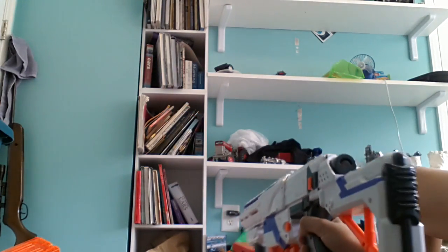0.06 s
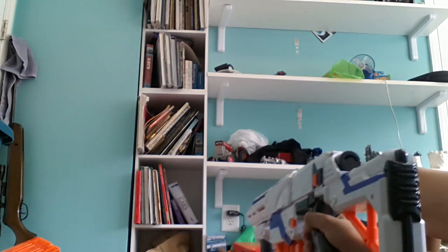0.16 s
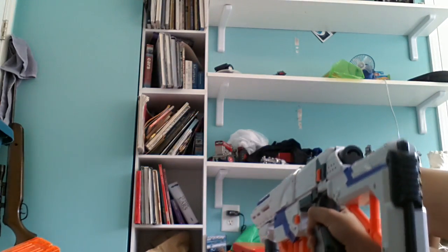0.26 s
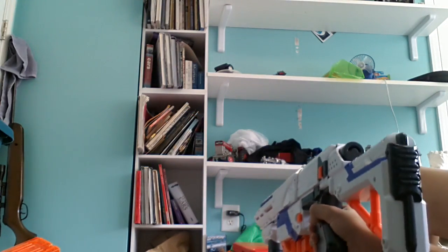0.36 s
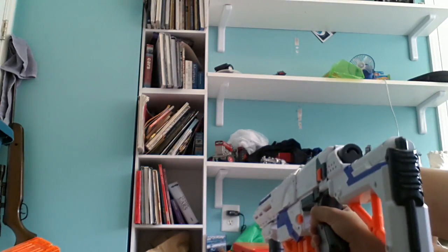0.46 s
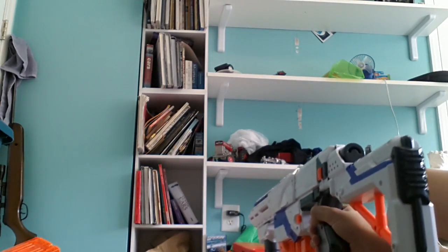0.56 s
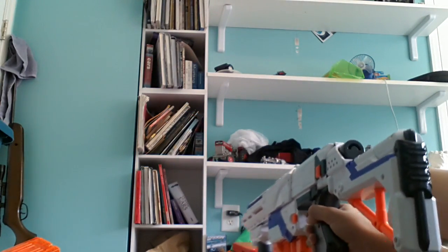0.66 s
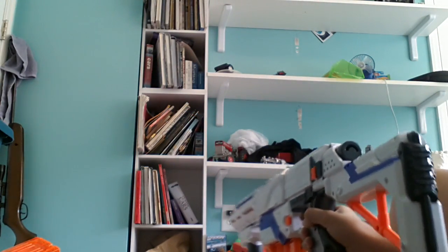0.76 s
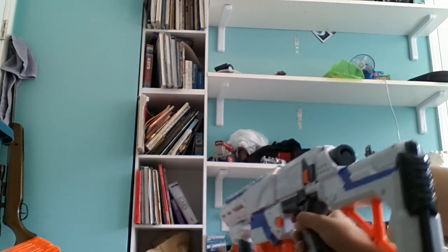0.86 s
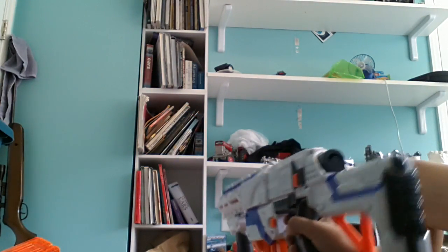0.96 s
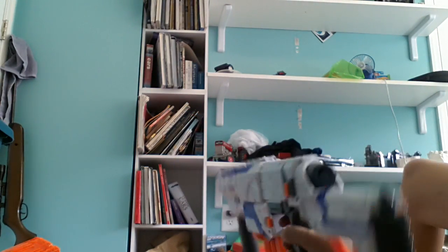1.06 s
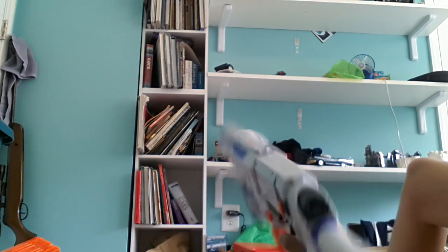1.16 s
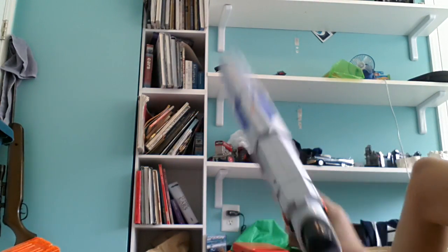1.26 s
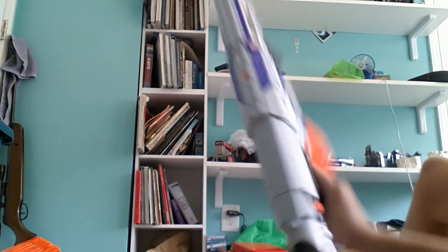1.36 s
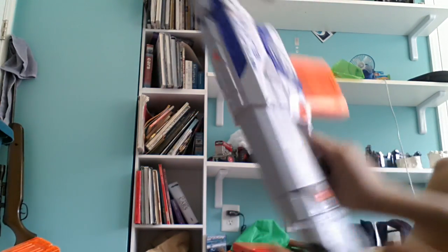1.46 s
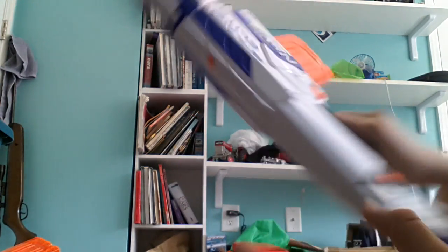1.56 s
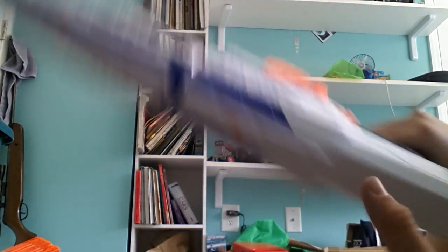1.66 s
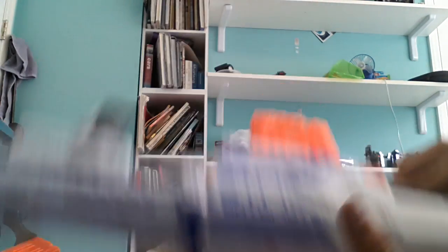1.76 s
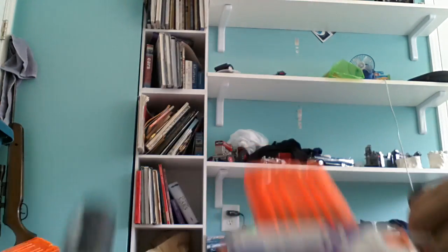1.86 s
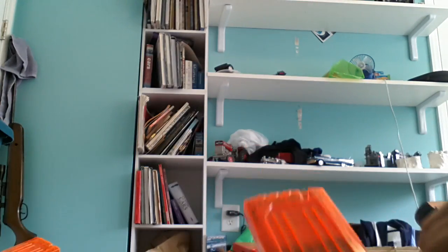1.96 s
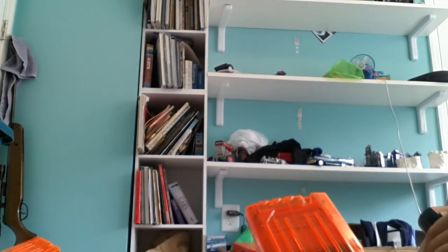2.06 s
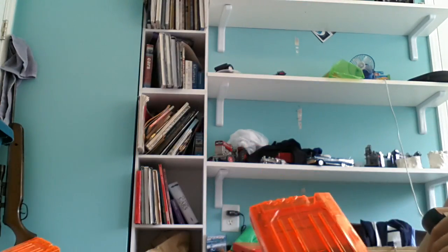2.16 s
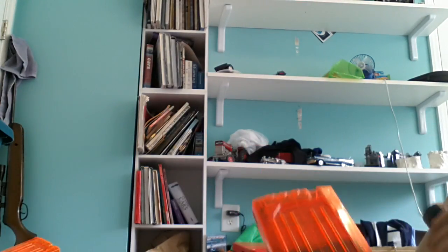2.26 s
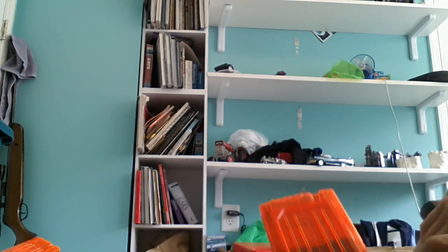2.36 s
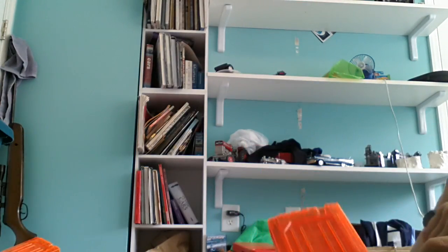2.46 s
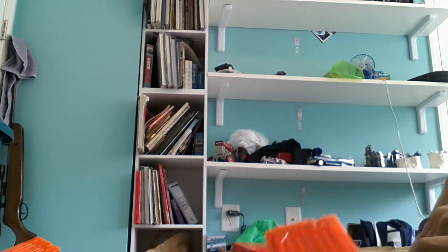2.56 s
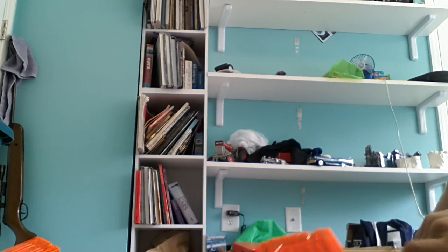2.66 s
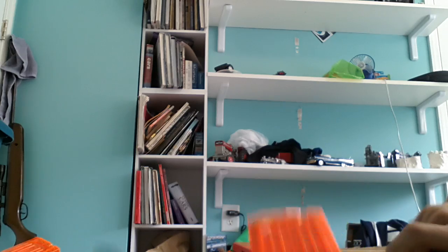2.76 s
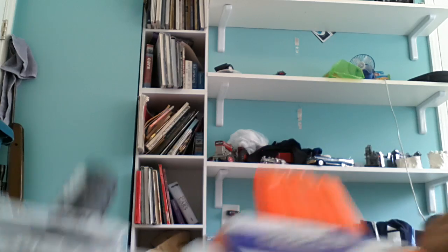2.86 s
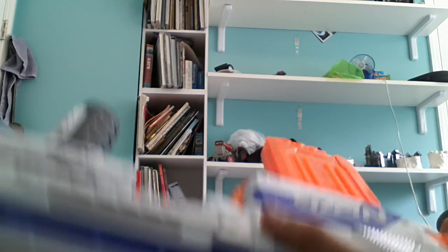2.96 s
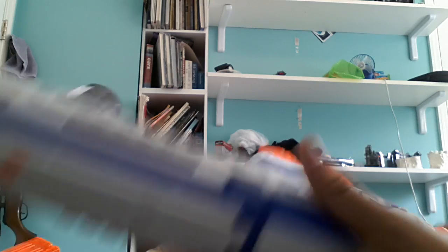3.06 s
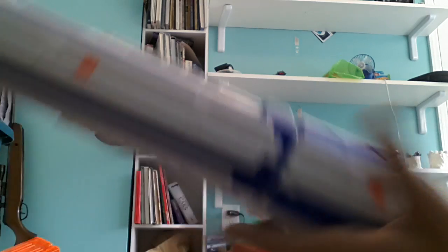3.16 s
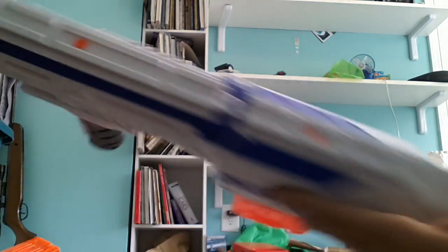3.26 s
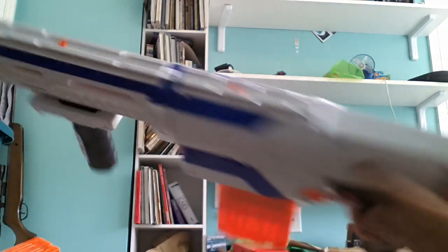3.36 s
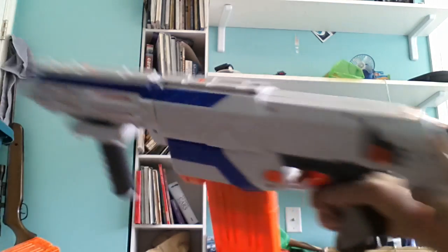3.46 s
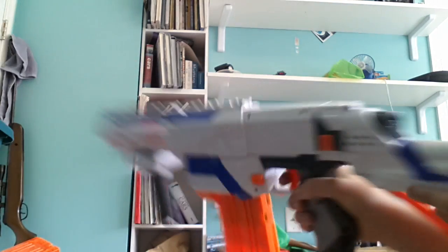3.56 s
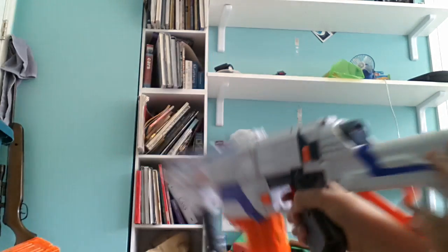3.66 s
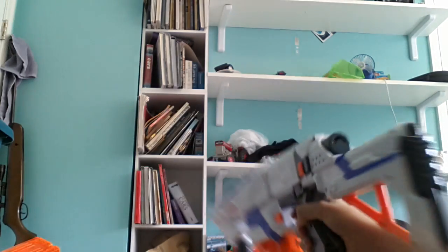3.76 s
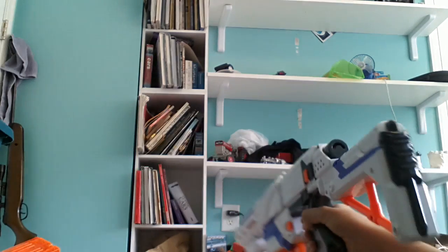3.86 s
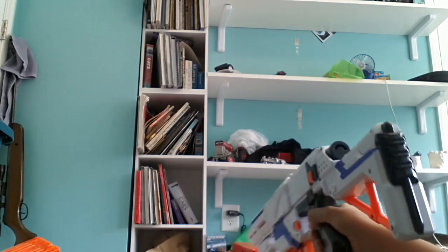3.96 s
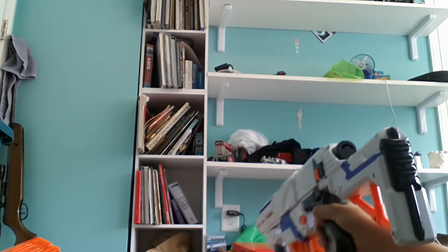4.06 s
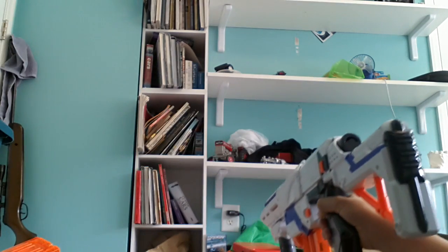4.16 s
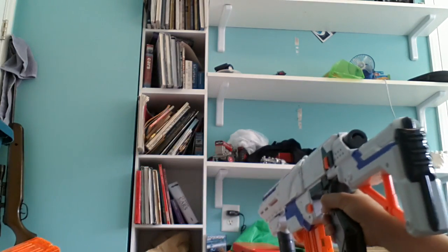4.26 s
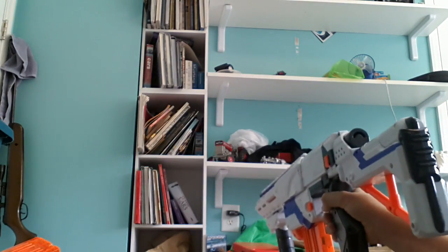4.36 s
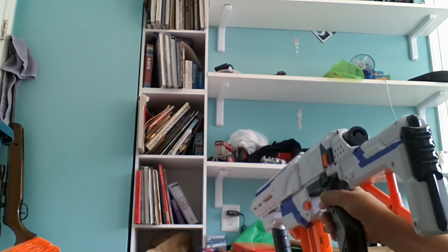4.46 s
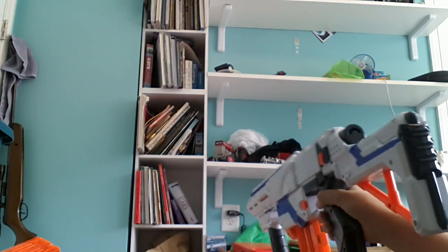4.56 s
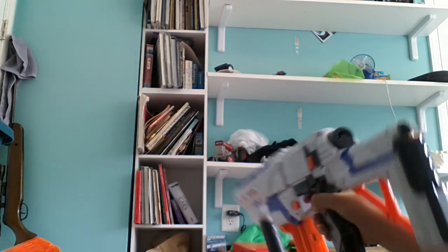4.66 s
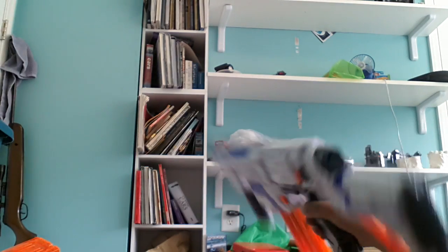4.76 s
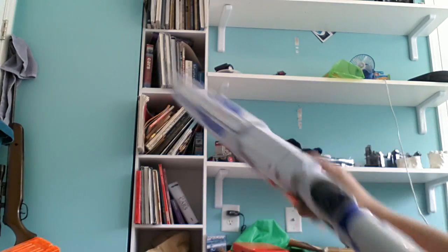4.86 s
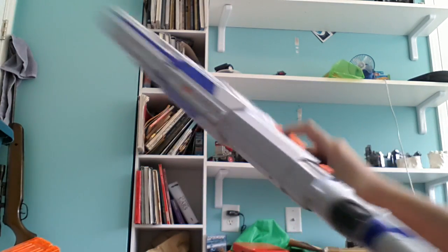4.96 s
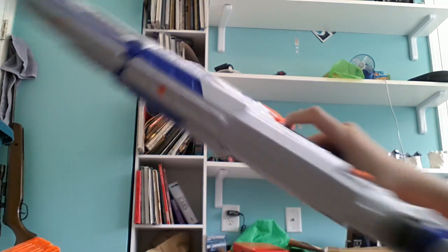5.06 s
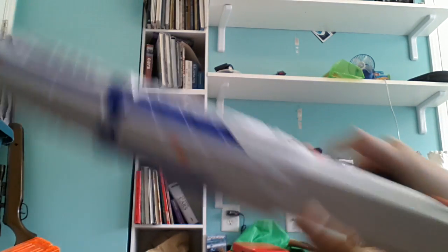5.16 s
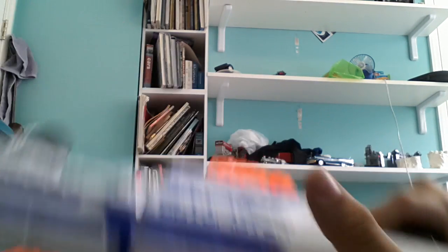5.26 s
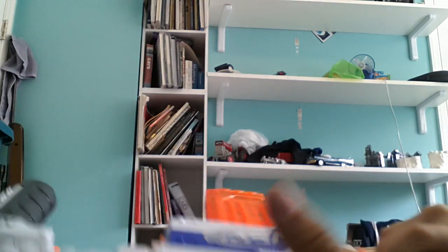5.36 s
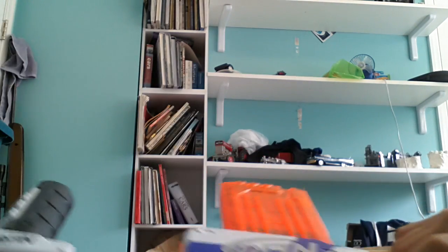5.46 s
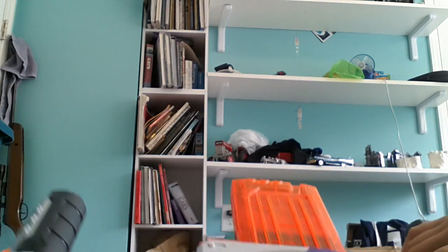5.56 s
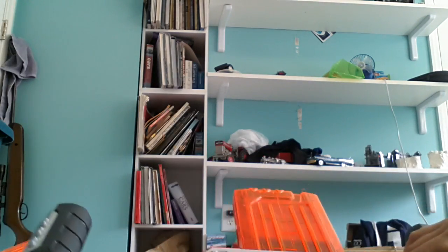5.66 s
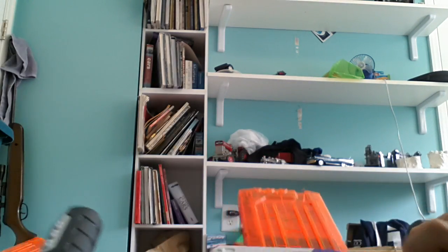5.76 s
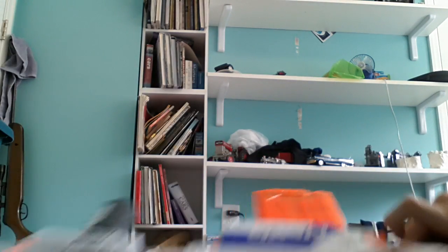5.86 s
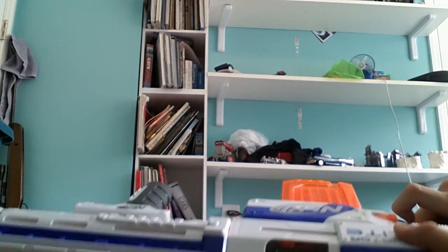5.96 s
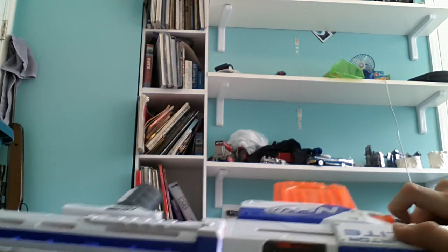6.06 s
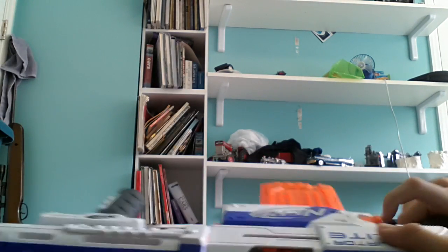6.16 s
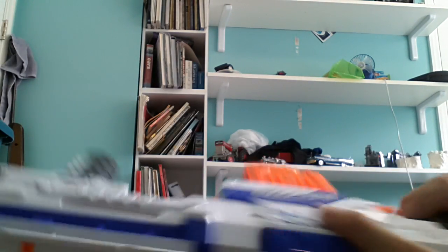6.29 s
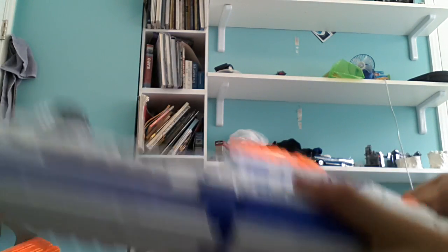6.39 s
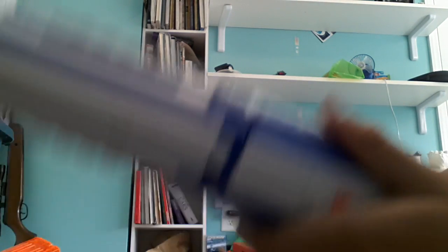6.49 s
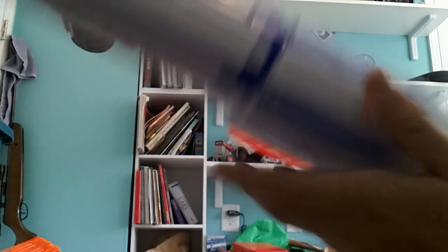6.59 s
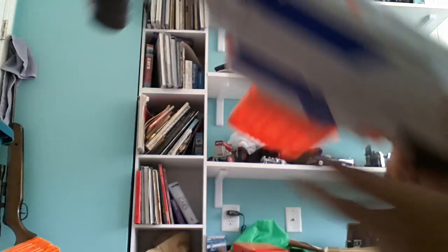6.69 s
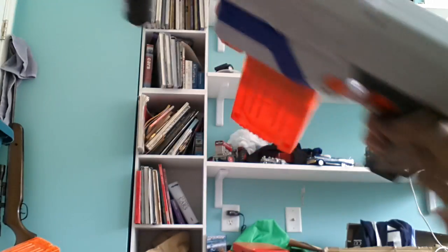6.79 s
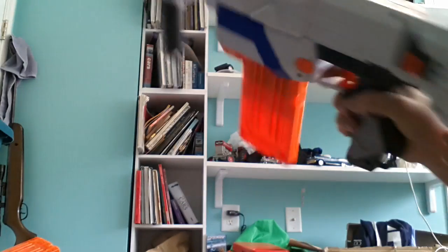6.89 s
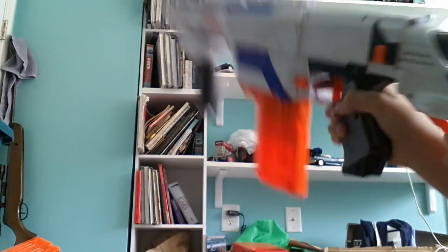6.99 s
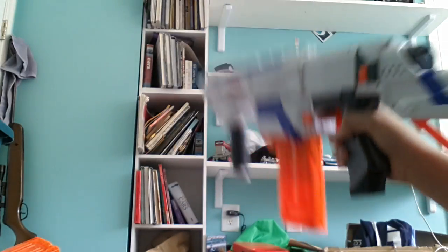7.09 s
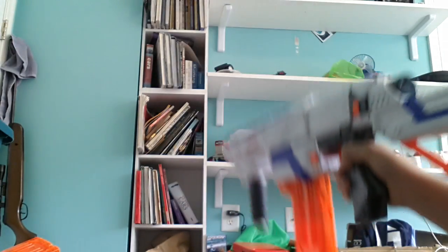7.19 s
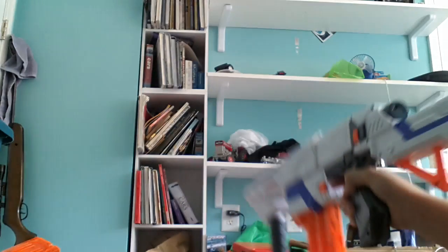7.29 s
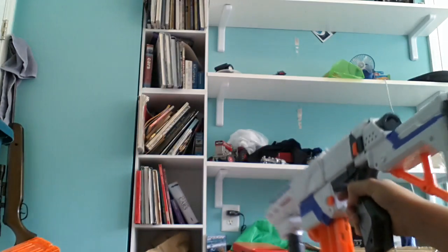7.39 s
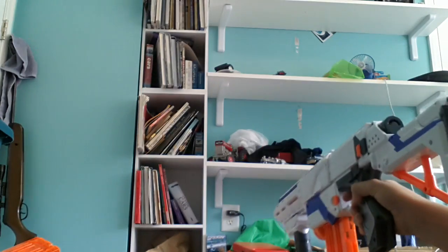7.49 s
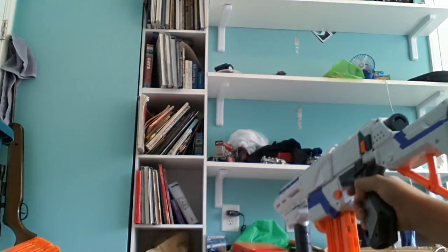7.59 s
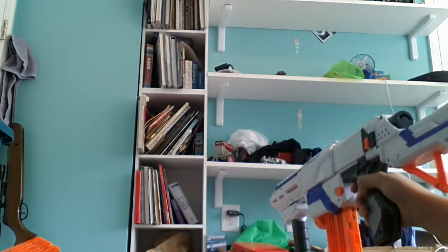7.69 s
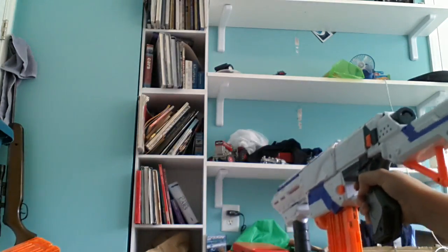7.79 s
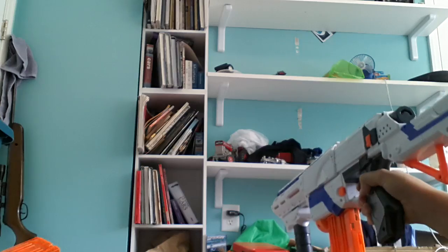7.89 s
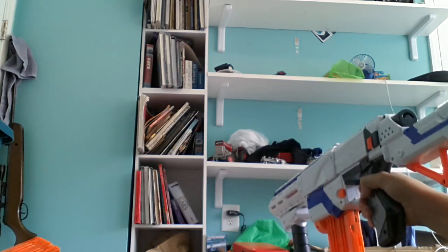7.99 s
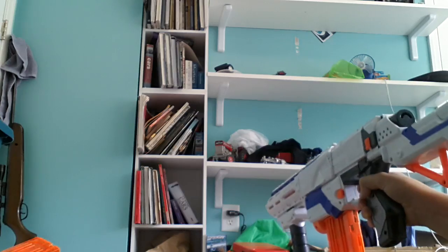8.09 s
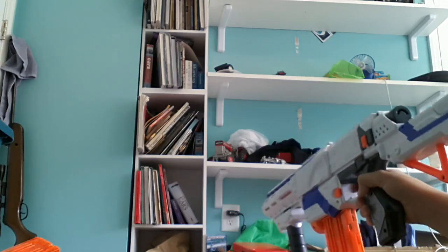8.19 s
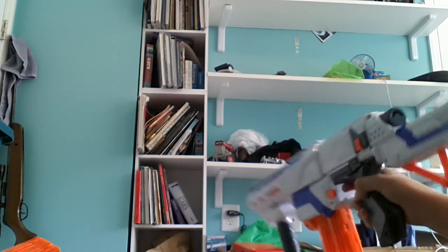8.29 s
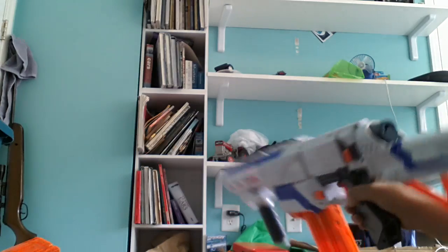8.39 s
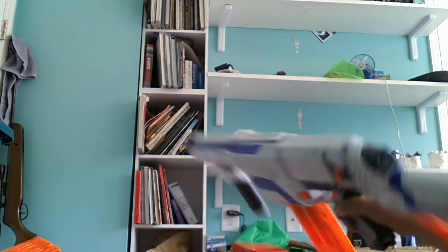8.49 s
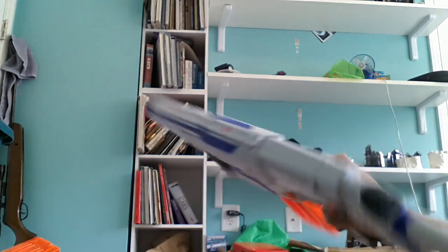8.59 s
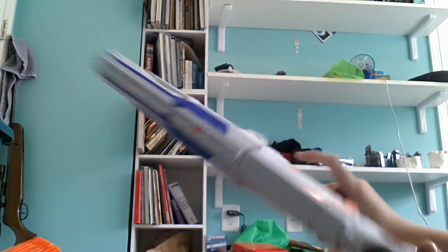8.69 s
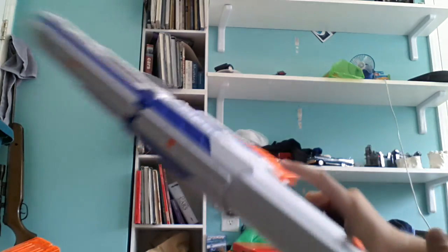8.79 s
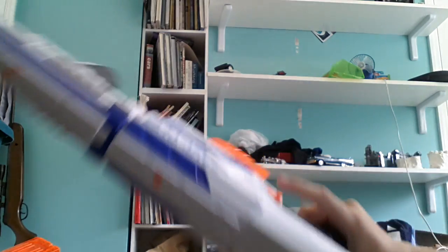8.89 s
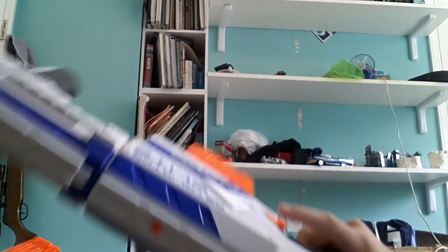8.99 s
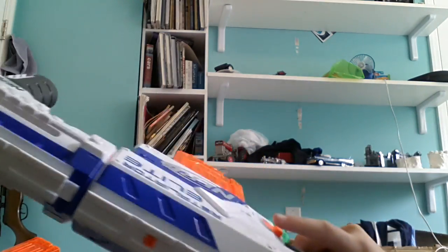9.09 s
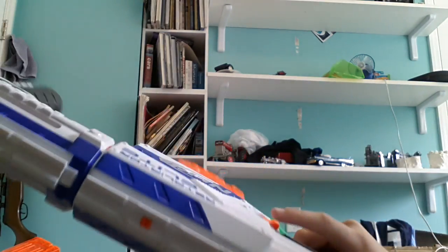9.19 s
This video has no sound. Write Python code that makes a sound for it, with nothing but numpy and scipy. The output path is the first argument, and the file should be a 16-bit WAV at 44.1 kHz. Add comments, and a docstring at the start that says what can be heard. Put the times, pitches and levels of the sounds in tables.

```python
"""A small room, close to a camera microphone: a spring foam-dart blaster is fired three times and primed twice.
A shot is the catch letting go and the plunger slamming home; the dart thumps a panel a moment later and drops.
Priming drags a rattling slide back and forth in the hollow plastic shell, all built from bursts of noise bands
and decaying modes. A fan hums steadily as filtered noise and a sine; the loudest blows overload the microphone."""
import sys
import numpy as np
from scipy import signal
from scipy.fft import rfft, irfft
from scipy.io import wavfile

SR = 44100
rng = np.random.default_rng(int(sys.argv[2]) if len(sys.argv) > 2 else 0)


def log_audio(samples):
    """Write samples as a 16-bit WAV file to the path given in sys.argv[1]."""
    # one column per channel
    frames = np.atleast_2d(samples).T
    # limit to full scale, then quantise
    limited = np.clip(frames, -1, 1)
    pcm = np.round(limited * 32767).astype(np.int16)
    wavfile.write(sys.argv[1], SR, pcm)


N = 407484
TIME = np.arange(N) / SR

# Event levels are relative: each source function sets its own balance on top.
# fan rush, spectrum: f/Hz, level/dB
FAN_RUSH = [(88, -51.5), (150, -12), (355, 2), (540, -6), (642, -12), (959, -12), (1580, -21), (1840, -24),
            (4780, -26), (7150, -29.5), (14500, -30.5)]
# faint fan rumble, spectrum: f/Hz, level/dB
FAN_RUMBLE = [(25, -18.5), (120, 39.0), (400, -17.5)]
RUSH_DB, RUMBLE_DB = -44.5, -64  # rms
HUM_HZ, HUM_DB = 120.4, -49  # rms

# colour of the room tail: f/Hz, level/dB
ROOM_COLOUR = [(80, -1), (500, 0), (2700, -4), (4500, -1.5), (8000, -2), (14000, 4)]

# spectrum of the plastic shell: f/Hz, level/dB
SHELL_COLOUR = [(71, -53.5), (120, -36.5), (404, -7.5), (614, -2), (1230, -8), (2240, -6), (3020, -8),
                (4500, -3.5), (5280, -6), (6570, -17), (7550, -19.5), (10800, -40), (14000, -49)]
# resonances of the hollow shell: f/Hz, width/Hz, lift/dB
SHELL_CAVITIES = [(1350, 540, 5), (2330, 40, 2), (4630, 1200, 6.5)]

# spells of light ticking and dull rubbing, the blaster handled or the fallen dart rattling as it rolls:
# start t/s, end t/s, ticking level/dB, dull rub level/dB
TICK_AND_RUB_SPELLS = [(1.115, 1.7, -50, -52.5), (1.804, 2.35, -48, -40), (2.91, 3.498, -41, -37.5),
                       (3.498, 4.189, -51.5, -55), (4.842, 5.9, -54.5, -40.5), (6.1, 7.3, -56, -45),
                       (7.543, 7.95, -50, -60), (8.166, 8.425, -27, -48), (9.114, 9.278, -44, -55)]
# spectrum of the dull rub: f/Hz, level/dB
RUB_COLOUR = [(25, -24), (170, -3), (300, 6.5), (520, 4.5), (850, -10.5), (1600, -15), (5000, -57.5)]
# light knocks, of the trigger, the handled shell or a dart landing:
# t/s, body level/dB, snap re body level/dB, hollow pitch f/Hz
LIGHT_KNOCKS = [(0.418, -10.5, -5, 1080), (1.335, -31, -4, 401), (1.416, -24.5, -14.5, 589),
                (1.494, -23.5, 0.5, 1150), (1.782, -24.5, -1.5, 1390), (2.064, -15.5, -11.5, 1400),
                (3.129, -17, -6, 505), (3.185, -12.5, -14.5, 594), (3.277, -14, -7.5, 454),
                (3.384, -19, -5, 606), (3.525, -27, 2, 755), (3.611, -19, -2, 1310),
                (3.665, -14.5, 0.5, 974), (4.252, -28.5, 4.5, 460), (4.722, -20, 1, 465),
                (5.006, -24, -3, 1000), (5.241, -17.5, -5, 1050), (5.33, -9.5, -7.5, 480),
                (5.579, -11.5, -8, 610), (6.582, -15, -9.5, 549), (6.638, -13.5, -13, 750),
                (6.973, -26.5, -2, 800), (7.007, -20.5, 0.5, 1240), (7.84, -26, 2, 1280),
                (8.853, -22.5, 0.5, 519)]
GRAZE_S, GRAZE_DB = 0.003, -19.5  # parts brush just before they meet

# dull bumps: t/s, f/Hz, level/dB
DULL_BUMPS = [(4.739, 238, -21.5)]

# slide rubbing along its rails: start t/s, end t/s, start level/dB, end level/dB
SLIDE_STROKES = [(2.313, 2.48, -14.5, -22), (2.701, 2.97, -38.5, -34.5), (5.823, 5.986, -25.5, -59),
                 (6.15, 6.41, -24, -36.5)]
# slide takes up its play or runs into a stop: t/s, body level/dB, snap (treble) re body level/dB, hollow f/Hz
SLIDE_CLACKS = [(2.247, -5.5, -9, 800), (2.3, -8, -11.5, 537), (2.333, 5, -10.5, 620),
                (2.437, -1, -13, 910), (2.713, -11.5, -13.5, 616), (2.832, -1.5, -0.5, 730),
                (2.861, 4, -12, 790), (2.94, 6, -6, 606), (5.834, 0, -4.5, 1030), (5.857, 6, -5, 545),
                (5.945, -2, -7, 900), (5.965, -4, -3.5, 547), (6.296, 2, -4.5, 740),
                (6.388, -4.5, 4.5, 690)]
REBOUND_S, REBOUND_DB, CLACK_T60_S = 0.012, -7, 0.061  # the slide chatters once after each clack
# slide pushed forward over evenly spaced teeth: first tooth t/s, last tooth t/s, last tooth level/dB
TOOTH_RUNS = [(2.736, 2.783, -13), (6.104, 6.265, -7)]
TOOTH_S, TOOTH_SNAP_DB, TOOTH_HZ, TOOTH_T60_S = 0.026, 1, 726, 0.034
TOOTH_RISE_DB = 7  # per doubling of the travel
# slide under load, sticking and slipping unevenly: first slip t/s, last slip t/s, first slip level/dB
SLIP_RUNS = [(2.356, 2.377, -7.5), (2.8, 2.826, -17.5), (2.877, 2.925, -7.5), (5.88, 5.891, -12),
             (6.33, 6.373, -6.5)]
SLIP_S, SLIP_JITTER_S, SLIP_T60_S = 0.022, 0.0017, 0.067
SLIP_SNAP_DB, SLIP_HZ, SLIP_SPREAD_OCTAVES = -1.5, 679, 0.16
SLIP_FALL_DB = 3  # each slip is weaker than the one before
# mechanism hits its stops and latches, shaking the spring: t/s, body level/dB, snap re body level/dB
LATCH_HITS = [(2.403, -7, 10.5), (2.487, -16.5, 8.5), (2.497, -11.5, 8.5), (2.949, 0, -1),
              (2.957, -1.5, 3.5), (5.861, -14.5, 7), (5.917, -11.5, 11), (6.400, -2, -1),
              (6.412, -8.5, 3.5)]
# ringing modes of the spring: f/Hz, level/dB, t60/s
SPRING_MODES = [(4360, -41, 0.1), (4310, -19.5, 0.052), (5240, -1.5, 0.26), (5480, -9.5, 0.067)]
SPRING_DB = -29.5  # re the snap that shakes it

# fallen dart lands and bounces once: t/s, level/dB, time in the air/s
DART_DROPS = [(0.713, -8, 0.11), (4.66, -18, 0.13), (8.256, -7.5, .092)]
DROP_SNAP_DB, DROP_HZ, BOUNCE_DB = -2, 764, -12
# dart strikes the panel: t/s, thump f/Hz, thump level/dB, panel rattle level/dB, metallic ring level/dB
PANEL_HITS = [(0.5043, 476, 17, 1.5, -37), (4.4994, 499, 16.5, -1.5, -42), (8.068, 520, 1.5, -8.5, -9.5)]
# spectrum of the rattling panel: f/Hz, level/dB
PANEL_COLOUR = [(80, -28.5), (220, -5.5), (500, -6.5), (1200, 3.5), (2500, -15.5), (4300, 2.5),
                (5200, -11.5), (7000, -23), (14000, -70.5)]
# ringing modes of the panel: f/Hz, level/dB, t60/s
PANEL_RING = [(489, 3.5, 0.18), (526, -23, 0.24), (776, 1.5, 0.25), (1269, -5.5, 0.43)]
# metallic ringing modes: f/Hz, level/dB, t60/s
METAL_RING = [(3940, -5, 0.35), (4410, 10, 0.1), (5070, -17, 0.21)]

# trigger pulls: t/s, catch level/dB, plunger level/dB
TRIGGER_PULLS = [(0.44, -2.5, 4.5), (4.426, 1.5, 1), (7.9976, 3, 2.5)]
# spectrum of the plunger slam: f/Hz, level/dB
PLUNGER_COLOUR = [(60, -65), (150, -3.5), (350, 3.5), (750, 6), (1300, 3.5), (2600, -6), (4400, -3),
                  (5400, -1), (7000, -19.5), (14000, -39)]
# spectrum of the spring rattling after a shot: f/Hz, level/dB
RATTLE_COLOUR = [(300, -38.5), (900, -12), (1250, -0.5), (2400, -10), (4300, -5.5), (5300, -5.5),
                 (8000, -77.5)]

TOP_HZ = 15300  # upper limit of the microphone channel


def undb(db):
    """Decibels to gain."""
    return 10 ** (np.asarray(db) / 20)


def unit(x):
    """Scale to rms 1."""
    return x / np.sqrt(np.mean(x ** 2) + 1e-20)


def add(track, s, sound):
    """Mix a sound into the track from time s."""
    i = max(int(s * SR), 0)
    track[i:i + len(sound)] += sound[:max(len(track) - i, 0)]


def colour(points, f):
    """Gain of a (Hz, dB) spectrum at frequencies f."""
    hz, db = np.transpose(points)
    return undb(np.interp(np.log(f + 1), np.log(hz), db))


def tint(x, points):
    """Filter a sound with a spectrum."""
    f = np.fft.rfftfreq(len(x), 1 / SR)
    return irfft(rfft(x) * colour(points, f), len(x))


def fade(t, t60):
    """Exponential decay, 60 dB down at t60."""
    return np.exp(-np.log(1000) * t / np.maximum(t60, 1e-3))


def burst(gain_at, t60, low_hold, rise_s=0.00066, size=8192):
    """Crowded modes struck at once: half-octave noise bands, the low ones ringing longer; starts near rms 1."""
    t, f = np.arange(size) / SR, np.fft.rfftfreq(size, 1 / SR)
    centres = 62.5 * 2 ** (np.arange(17)[:, None] / 2)
    octaves = np.log2((f + 1) / centres)
    gains = np.clip(1 - 2 * np.abs(octaves), 0, 1) * gain_at(f)
    contact = 1 - np.exp(-(t / rise_s) ** 2)
    band_t60 = t60 * (1000 / centres) ** low_hold
    bands = irfft(gains * rfft(rng.standard_normal(size))) * contact * fade(t, band_t60)
    # each band keeps the energy its gain asks for, however fast it fades
    balance = np.linalg.norm(gains, axis=1) / np.linalg.norm(bands, axis=1)
    sound = (bands * balance[:, None]).sum(0)
    return unit(sound) * np.sqrt(np.mean(fade(t, t60) ** 2))


def ring(modes, split=0, count=1, contact_s=0.00021, size=20000):
    """Decaying modes; each may split into close partials that beat roughly."""
    t = np.arange(size) / SR
    total = np.zeros(size)
    for hz, db, t60 in modes:
        for _ in range(count):
            partial_hz = hz * (1 + split * rng.standard_normal())
            polarity = rng.choice([-1, 1])
            total += polarity * undb(db) * fade(t, t60) * np.cos(2 * np.pi * partial_hz * t)
    return (1 - np.exp(-t / contact_s)) * total / np.sqrt(count)


def shell_gain(f, snap_db=0, split_hz=3200):
    """The hollow plastic shell; a harder contact lifts its treble."""
    lift_db = sum(db / (1 + (2 * (f - hz) / width) ** 2) for hz, width, db in SHELL_CAVITIES)
    treble_share = f ** 6 / (f ** 6 + split_hz ** 6)
    return colour(SHELL_COLOUR, f) * undb(lift_db + snap_db * treble_share)


def clack(db, snap_db, t60, hollow_hz=650, hollow_db=7, hollow_q=5, spot_db=3.5, rise_s=0.00085):
    """Plastic strikes plastic: each spot on the shell has its own hollow pitch and favours other low modes."""
    spot_hz = np.geomspace(200, 14000, 48)
    # the high modes are too crowded to stand out singly
    favour_db = spot_db * rng.standard_normal(len(spot_hz)) * (spot_hz < 2600)
    spot = np.column_stack([spot_hz, favour_db])

    def gain_at(f):
        hollow = undb(hollow_db / (1 + (2 * hollow_q * (f / hollow_hz - 1)) ** 2))
        return shell_gain(f, snap_db) * colour(spot, f) * hollow

    strength = undb(db) * np.hypot(1, undb(snap_db))  # body and snap together
    return strength * burst(gain_at, t60, low_hold=0.058, rise_s=rise_s)


def knock(db, snap_db, hz):
    """A light knock: a graze, the contact GRAZE_S later, then a softer bounce."""
    out = np.zeros(SR // 4)
    graze = clack(db + GRAZE_DB, snap_db, t60=0.04, hollow_hz=hz, rise_s=0.0014)
    contact = clack(db - 3, snap_db + 3, t60=0.036, hollow_hz=hz, hollow_db=8.5, rise_s=0.0012)
    bounce = clack(db - 15.5, snap_db - 1, t60=0.16, hollow_hz=hz)
    add(out, 0, graze)
    add(out, GRAZE_S, contact)
    add(out, GRAZE_S + rng.uniform(0.007, 0.02), bounce)
    return out


def friction(rate, spread_db, gain_at, count=6):
    """Stick-slip: tiny clicks (rate per second) of unequal size at several contact points, through a body."""
    out = np.zeros(N)
    for _ in range(count):
        slips = np.zeros(N)
        at = np.flatnonzero(rng.random(N) < rate / count / SR)
        slips[at] = undb(spread_db * np.minimum(rng.exponential(size=len(at)), 4))
        body = burst(gain_at, t60=0.053, low_hold=0.33, rise_s=0.0015)
        out += signal.oaconvolve(slips, body)[:N]
    return unit(out)


def fan():
    """Steady rush of air over a motor hum and a faint rumble."""
    rush = undb(RUSH_DB) * unit(tint(rng.standard_normal(N), FAN_RUSH))
    rumble = undb(RUMBLE_DB) * unit(tint(rng.standard_normal(N), FAN_RUMBLE))
    hum = undb(HUM_DB) * np.sqrt(2) * np.sin(2 * np.pi * HUM_HZ * TIME)
    return rush + rumble + hum


def room(x, wet_db=-8.01, build_s=0.00083, echo_gain=0.1, move_s=0.2, count=6):
    """Near shelves echo within a short diffuse tail; patterns crossfade in turn as the blaster moves about."""
    out = x.copy()
    for place in range(count):
        tail = burst(lambda f: colour(ROOM_COLOUR, f), t60=0.42, low_hold=0.031, rise_s=build_s, size=32768)
        response = undb(wet_db) * tail / np.linalg.norm(tail)
        for s in rng.uniform(0.004, 0.017, size=3):
            response[int(s * SR)] += echo_gain
        # a triangle move_s either side of this place's turn, repeating
        share = np.clip(1 - np.abs((TIME / move_s - place + 1) % count - 1), 0, 1)
        out += signal.oaconvolve(np.sqrt(share) * x, response)[:N]
    return out


def ticks_rubs_and_knocks():
    """Stick-slip ticks and dull rubs swell and sink, among light knocks: parts handled or a dart come to rest."""
    out = np.zeros(N)
    ticks = friction(90, spread_db=3.3, gain_at=shell_gain)
    rub = friction(160, spread_db=5, gain_at=lambda f: colour(RUB_COLOUR, f))
    for start, end, ticks_db, rub_db in TICK_AND_RUB_SPELLS:
        swell = np.sin(np.pi * np.clip((TIME - start) / (end - start), 0, 1))
        out += swell * (undb(ticks_db) * ticks + undb(rub_db) * rub)
    for s, db, snap_db, hz in LIGHT_KNOCKS:
        add(out, s - GRAZE_S, knock(db, snap_db, hz))
    return out


def bumps():
    """A dull bump is one short low mode."""
    out = np.zeros(N)
    for s, hz, db in DULL_BUMPS:
        add(out, s, ring([(hz, db, 0.12)]))
    return out


def evenly(first, last, step_s):
    """Evenly spaced times from first to last, about step_s apart."""
    return np.linspace(first, last, round((last - first) / step_s) + 1)


def slide_blows():
    """Blows of the slide as (s, body dB, snap dB, hollow Hz, t60 s): stops and rebounds, ratchet teeth, judder."""
    for s, db, snap_db, hz in SLIDE_CLACKS:
        yield s, db - 6.5, snap_db + 4, hz, CLACK_T60_S
        yield s + REBOUND_S, db - 7.5 + REBOUND_DB, snap_db + 6, hz, CLACK_T60_S
    for first, last, db in TOOTH_RUNS:
        teeth = evenly(first, last, TOOTH_S)
        for k, s in enumerate(teeth):
            # the force grows with the travel
            tooth_db = db + TOOTH_RISE_DB * np.log2((k + 1) / len(teeth))
            yield s, tooth_db, TOOTH_SNAP_DB, TOOTH_HZ, TOOTH_T60_S
    for first, last, db in SLIP_RUNS:
        for k, s in enumerate(evenly(first, last, SLIP_S)):
            late, pitch = rng.standard_normal(2)
            hz = SLIP_HZ * 2 ** (SLIP_SPREAD_OCTAVES * pitch)
            yield s + SLIP_JITTER_S * late, db - SLIP_FALL_DB * k, SLIP_SNAP_DB, hz, SLIP_T60_S


def priming():
    """The slide scrapes, clatters over the ratchet and latches against the spring."""
    pressure = np.zeros(N)
    for start, end, start_db, end_db in SLIDE_STROKES:
        pressure += np.interp(TIME, [start, end], undb([start_db, end_db]), left=0, right=0)
    out = pressure * friction(700, spread_db=3.5, gain_at=lambda f: shell_gain(f, snap_db=-4))
    for s, db, snap_db in LATCH_HITS:
        add(out, s, clack(db, snap_db, t60=0.048))
        add(out, s, undb(db + snap_db + SPRING_DB) * ring(SPRING_MODES, split=0.035, count=12))
    for s, db, snap_db, hz, t60 in slide_blows():
        add(out, s, clack(db, snap_db, t60=t60, hollow_hz=hz, hollow_db=8.5))
    return out


def drops():
    """The spent dart falls and bounces once, each landing a light knock."""
    out = np.zeros(N)
    for s, db, air_s in DART_DROPS:
        add(out, s - GRAZE_S, knock(db, DROP_SNAP_DB, DROP_HZ))
        add(out, s + air_s - GRAZE_S, knock(db + BOUNCE_DB, DROP_SNAP_DB, DROP_HZ))
    return out


def dart(rebound_s=0.0081):
    """The soft tip thumps a panel, which rings on and rattles as it springs back."""
    out = np.zeros(N)
    for s, hz, thump_db, rattle_db, metal_db in PANEL_HITS:
        thump = ring([(hz, thump_db, 0.022)])
        panel_ring = undb(thump_db - 25) * ring(PANEL_RING, split=0.07, count=6)
        slap = clack(rattle_db + 6, snap_db=-0.5, t60=0.016, rise_s=0.0001)
        metal = undb(metal_db) * ring(METAL_RING, split=0.027, count=20)
        rattle = undb(rattle_db) * burst(lambda f: colour(PANEL_COLOUR, f), t60=0.096, low_hold=0.06)
        for part in (thump, panel_ring, slap, metal):
            add(out, s, part)
        add(out, s + rebound_s, rattle)
    return out


def shots(travel_s=0.006, rattle_db=-17):
    """The catch snaps, then the plunger slams home and leaves the spring rattling."""
    out = np.zeros(N)
    for s, catch_db, plunger_db in TRIGGER_PULLS:
        catch = clack(catch_db - 10.5, snap_db=6.5, t60=0.084, rise_s=0.00072)
        slam = undb(plunger_db) * burst(lambda f: colour(PLUNGER_COLOUR, f), t60=0.1, low_hold=0.013)
        rattle = burst(lambda f: colour(RATTLE_COLOUR, f), t60=0.55, low_hold=0, size=32768)
        add(out, s, catch)
        add(out, s + travel_s, slam)
        add(out, s + travel_s, undb(rattle_db) * rattle)
    return out


def scene():
    """One microphone hears it all; both channels carry it."""
    near = ticks_rubs_and_knocks() + bumps() + priming() + drops() + dart() + shots()
    mono = fan() + room(near)
    return np.array([mono, mono])


def record(dry):
    """The microphone input clips flat at full scale, then everything above TOP_HZ is cut."""
    clipped = np.clip(dry, -1, 1)
    top_cut = signal.ellip(8, 0.2, 70, TOP_HZ, fs=SR, output="sos")
    return signal.sosfilt(top_cut, clipped)


dry = scene()
out = record(dry)
log_audio(out)
```